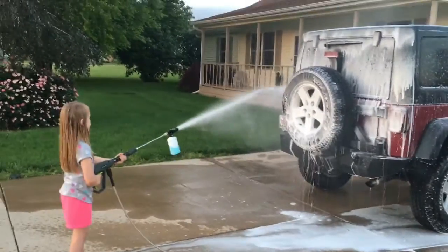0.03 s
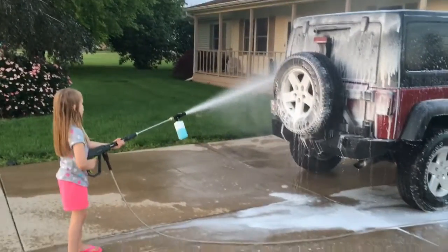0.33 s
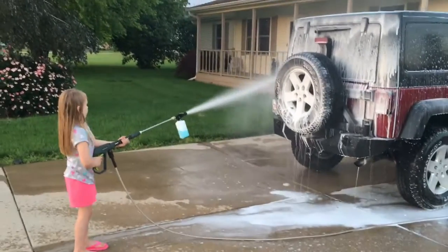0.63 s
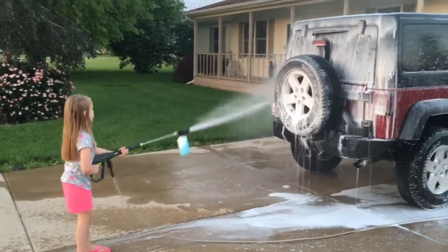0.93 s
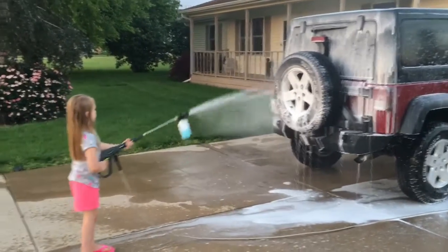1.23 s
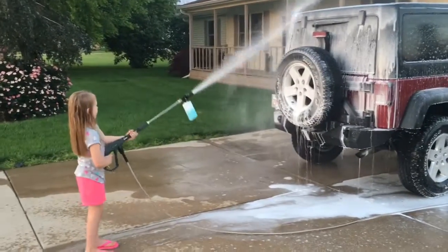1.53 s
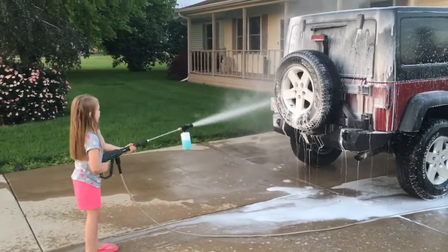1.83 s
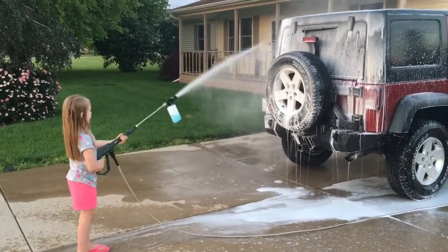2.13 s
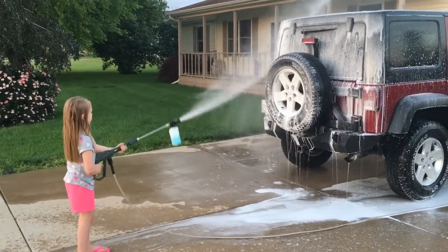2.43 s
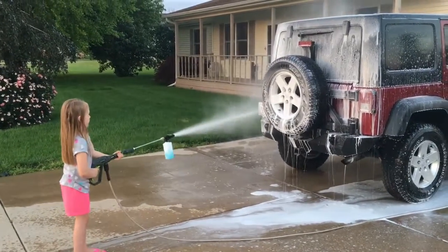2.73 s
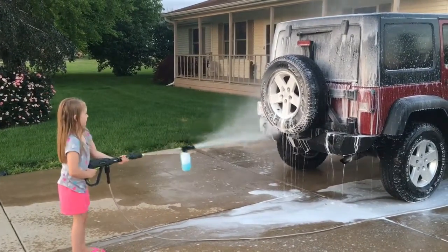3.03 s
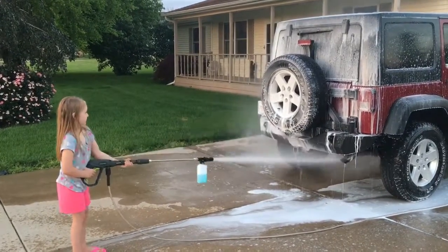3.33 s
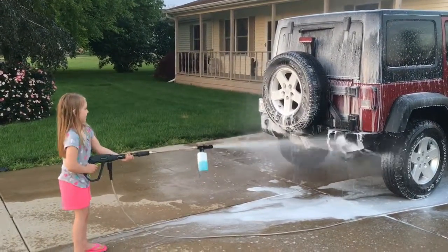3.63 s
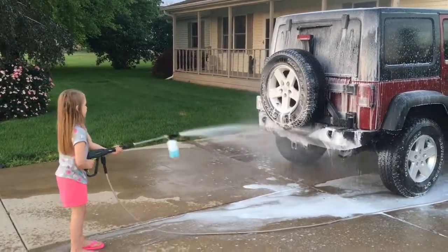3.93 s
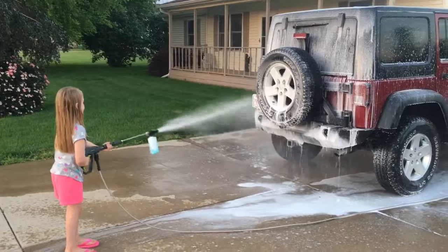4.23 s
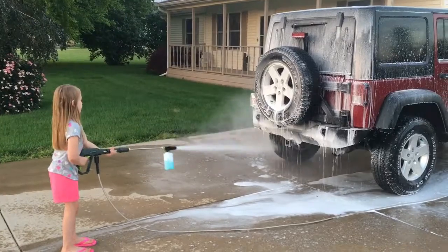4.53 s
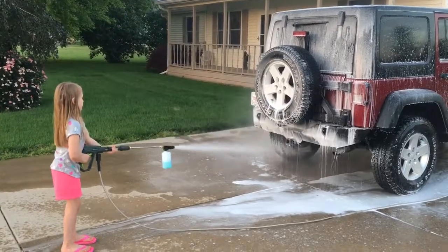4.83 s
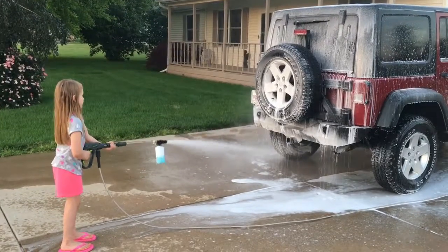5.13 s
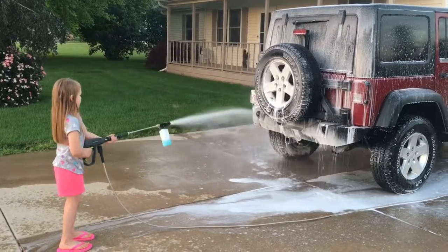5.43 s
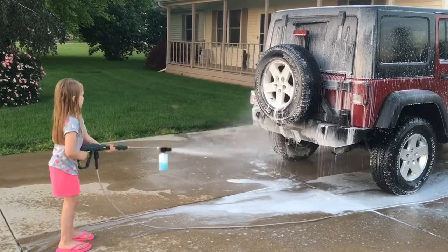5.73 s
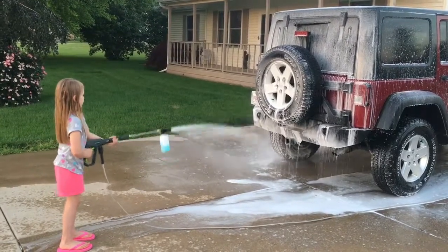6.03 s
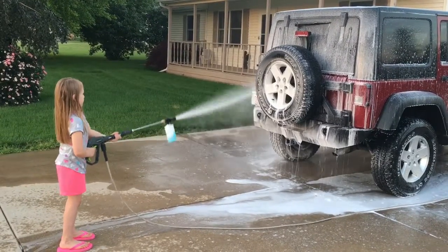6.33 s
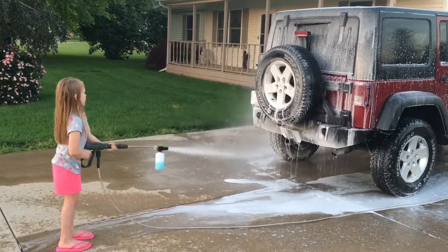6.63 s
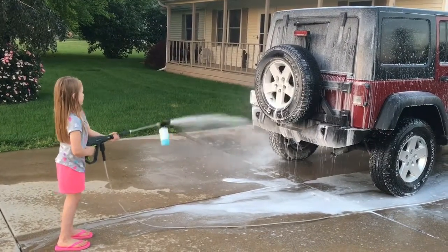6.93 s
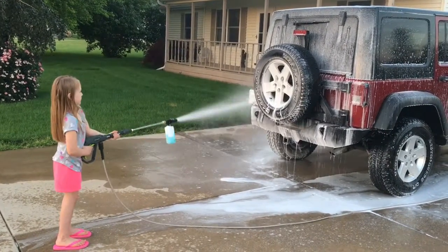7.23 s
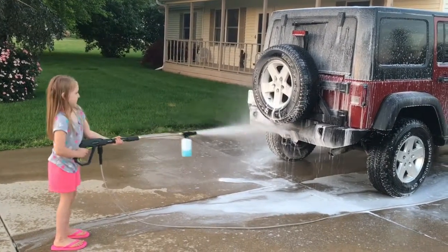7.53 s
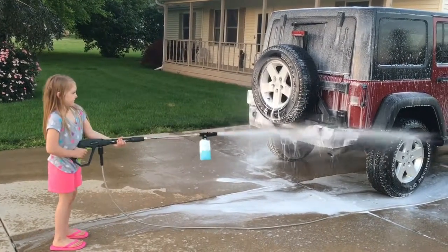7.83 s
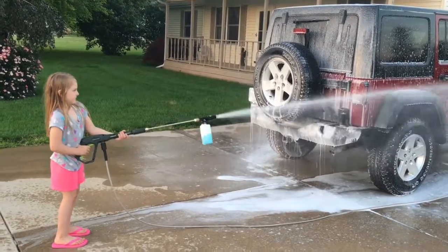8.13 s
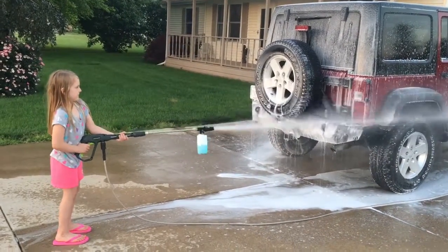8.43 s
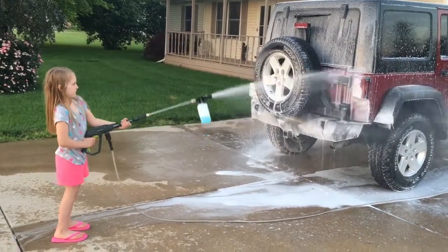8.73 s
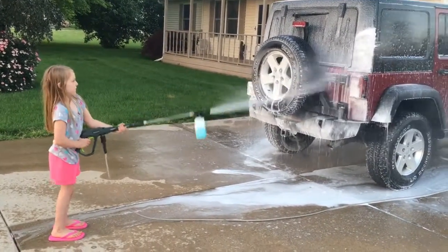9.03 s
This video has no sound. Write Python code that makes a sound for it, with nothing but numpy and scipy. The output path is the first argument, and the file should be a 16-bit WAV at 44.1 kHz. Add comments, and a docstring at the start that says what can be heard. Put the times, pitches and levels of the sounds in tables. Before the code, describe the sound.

A pressure washer sprays foam onto a car on a concrete driveway for about nine seconds without stopping. From the start the nozzle gives a sputtering roar, with a fine, bright hiss and a dense spatter of droplets on the bodywork. A steady pump drone and a dull outdoor rush lie underneath. The spray's tone sweeps up and down as the wand is raised and lowered. Near 2 seconds a panel booms softly, returning faintly later. From about 3 to 4 seconds the jet sizzles along the bumper and turns raspier as it swings toward the listener. Around 4.3 seconds it slips past the car and the splash briefly thins, then sizzles again near 4.8. The sweeping strokes continue, with another sizzle around 7.5 seconds. The spray is brighter and raspier around 8 to 9 seconds, the splash thinning briefly before a last sizzling pass from 8.6.

```python
"""A pressure washer with a foam nozzle soaps a car on a concrete driveway.
From the start the jet roars in the nozzle's short tube, mist hisses and foam spatters over a droning pump;
the echo off the concrete sweeps in pitch as the wand is raised and lowered. Near 2 s a panel booms.
After 3 s the jet sizzles along the bumper and swings towards the listener, then briefly slips past the car.
The wand works lower, rises again from 7 s, and the nozzle swings round once more near the end."""
import sys
import numpy as np
from scipy import signal
from scipy.fft import rfft, irfft
from scipy.io import wavfile
from scipy.ndimage import uniform_filter1d, map_coordinates

SR = 44100
rng = np.random.default_rng(int(sys.argv[2]) if len(sys.argv) > 2 else 0)


def dump_mix(stems):
    """Bounce the given channels to the path in sys.argv[1] as a 16-bit WAV at rate SR."""
    frames = np.atleast_2d(stems).T  # one column per channel
    limited = np.clip(frames, -1, 1)  # hard clip at full scale
    pcm = np.round(limited * 32767).astype(np.int16)
    wavfile.write(sys.argv[1], SR, pcm)


N = 409248
TIME = np.arange(N) / SR
BIN_HZ = np.maximum(np.arange(N // 2 + 1) * SR / N, 1)

# The jet slips past the car and the splash thins: start_s, length_s, mist_change_db
JET_MISSES = [(-.1, 0.42, -1.2), (4.22, 0.33, -2), (7.9, 0.65, -.8)]


def from_db(db):
    """Amplitude grows tenfold for every 20 dB."""
    return 10 ** (np.asarray(db) / 20)


def unit_rms(x):
    """Dividing by the rms gives a signal unit power."""
    return x / np.sqrt(np.mean(x ** 2) + 1e-20)


def noise(gain):
    """Filtered white noise takes on the filter's spectrum; unit rms."""
    return unit_rms(irfft(rfft(rng.standard_normal(N)) * gain, N))


def drift(rate_hz):
    """Low-passed noise is a slow random fluctuation; unit rms."""
    return noise(1 / (1 + (BIN_HZ / rate_hz) ** 2))


def colour(spectrum):
    """A spectral envelope: gain from straight lines in decibels against log frequency."""
    hz, db = np.transpose(spectrum)
    return from_db(np.interp(np.log(BIN_HZ), np.log(hz), db))


def swells(rows):
    """Raised-cosine envelopes in dB rise and fall about each event's middle."""
    return sum(db * np.cos(np.pi * np.clip((TIME - middle_s) / length_s, -.5, .5)) ** 2
               for middle_s, length_s, db in rows)


def passes(rows, edge_s=0.12):
    """Trapezoidal envelopes in dB: the fan of spray takes edge_s to cross an edge."""
    return sum(db * np.clip(.5 + np.minimum(TIME - start_s, start_s + length_s - TIME) / edge_s, 0, 1)
               for start_s, length_s, db in rows)


def tube_resonance(modes, skirt_widths):
    """Turbulence drives each mode of a tube independently; its power is proportional to its bandwidth."""
    out = 0
    for pitch_hz, width_hz, db in modes:
        response = 1 / np.hypot(1, (BIN_HZ / pitch_hz - pitch_hz / BIN_HZ) * pitch_hz / width_hz)
        skirt = 1 / np.hypot(1, (BIN_HZ - pitch_hz) / (skirt_widths * width_hz))
        out += noise(response * skirt) * from_db(db) * np.sqrt(width_hz)
    return unit_rms(out)


def nozzle():
    """Turbulent mixing of air and soap excites quarter-wave resonances: a sputtering roar and rasp."""
    # Low and high resonances of the tube: pitch_hz, width_hz, relative_db
    roar_modes = [(1107, 123, 1), (960, 122, -7.5)]
    rasp_modes = [(3418, 367, -1), (5650, 780, -5), (7940, 820, -15.5)]
    # Spectrum of the open jet: frequency_hz, relative_db
    jet_spectrum = [(100, -4), (250, 4), (440, -5), (560, -0.5), (700, 2.5), (900, 10), (1300, -14),
                    (1700, -7), (2300, 6), (2720, -13.5), (3100, 11), (4200, 5.5), (4900, -2.5), (6300, 3),
                    (7200, -11), (10000, -5.5)]
    # The nozzle gulps air: middle_s, length_s, roar_boost_db
    gulps = [(.09, .12, 3.5)]
    # The nozzle swings towards the listener: middle_s, length_s, rasp_boost_db
    swings = [(3.62, 0.74, 3), (4.8, 0.48, 0.2), (8.45, 2.7, 3)]
    facing_db = swells(swings)
    sputter = drift(rate_hz=29)
    intake_db = swells(gulps) + 0.25 * drift(rate_hz=3)   # air is drawn in unevenly
    roar_db = -35 + 0.26 * facing_db + intake_db + 0.67 * sputter
    roar = from_db(roar_db) * tube_resonance(roar_modes, skirt_widths=6)
    rasp = from_db(-38.5 + facing_db) * tube_resonance(rasp_modes, skirt_widths=0.66)
    open_jet = from_db(-40.5 + 0.53 * facing_db) * noise(colour(jet_spectrum))
    return roar + (rasp + open_jet) * from_db(0.99 * sputter)


def wand_lag_ms():
    """Echo delay follows wand height; each stroke runs from rest to rest, like half a pendulum cycle."""
    # Turning points of the wand: time_s, echo_lag_ms
    turning_points = [(0, 1.86), (.41, 1.96), (0.911, 1.91), (1.19, 1.56), (1.551, 2.39), (1.95, 1.62),
                      (2.3, 2.23), (2.78, 1.57), (3.36, 1.4), (3.74, 1.59), (4.01, 1.44), (4.26, 1.53),
                      (4.58, 1.185), (4.839, 1.167), (5.15, 1.063), (5.58, 1.51), (5.94, 1.03),
                      (6.38, 1.695), (6.78, 1.01), (7.18, 1.6), (7.58, 1.46), (8.18, 2.06), (8.62, 1.79),
                      (8.98, 2.35), (9.32, 1.59)]
    time_s, lag_ms = np.transpose(turning_points)
    turns = np.arange(len(time_s))
    stroke, progress = np.divmod(np.interp(TIME, time_s, turns), 1)
    return np.interp(stroke + np.sin(np.pi * progress / 2) ** 2, turns, lag_ms)


def tyre_incidence(square_lag_ms=1.62, width_ms=0.2):
    """Normal incidence splashes most: nears 1 at the height where the jet meets the spare tyre squarely."""
    return np.exp(-((wand_lag_ms() - square_lag_ms) / width_ms) ** 2)


def mist(flutter_db=1.46, bands=10):
    """Atomisation: the spray tears apart with a fine hiss, each droplet size fluctuating on its own."""
    # Spectrum of the hiss: frequency_hz, relative_db
    hiss_spectrum = [(3000, -27), (5000, -6), (6500, 2.5), (7100, 3), (7900, 5), (9700, 3), (10450, -2),
                     (11100, -1), (12400, -3), (13000, -9), (14000, -12.5), (15700, -29.5)]
    # The jet catches an edge and throws up a cloud: middle_s, length_s, boost_db
    clouds = [(1.2, .55, 2), (4.0, 0.23, 2.5), (6.5, .25, 1.5), (7.33, .4, 1)]
    level_db = -37.5 + 0.9 * tyre_incidence() + passes(JET_MISSES) + swells(clouds)
    hiss = rfft(noise(colour(hiss_spectrum)))
    centres_hz = np.geomspace(5000, 15000, bands)
    out = 0
    for weights in np.eye(bands):
        band = irfft(hiss * np.interp(BIN_HZ, centres_hz, weights), N)
        out += band * from_db(flutter_db * drift(rate_hz=12))
    return out * from_db(level_db)


def ground_echo(direct, reflection=0.7, dull_hz=3170):
    """Comb filtering: wet concrete adds a duller copy, later when the wand is higher."""
    dull = irfft(rfft(direct) / np.hypot(1, BIN_HZ / dull_hz), N)
    delayed_index = np.arange(N) - wand_lag_ms() * SR / 1000
    return direct + reflection * map_coordinates(dull, [delayed_index], order=3, mode="mirror")


def spatter(drops_per_s=16000, spread_db=6.5):
    """Shot noise: countless droplets of uneven size burst on the bodywork, in clumps."""
    # Spectrum of a droplet's impact: frequency_hz, relative_db
    impact_spectrum = [(60, 1.5), (200, -2.5), (450, -16), (2100, -16), (2700, -9.5), (4000, -3),
                       (7000, -13), (9700, 2.5), (10450, -6.5), (11300, -1.5), (13500, -3.5), (15700, -7.5)]
    # The jet sizzles along the bumper: start_s, length_s, splash_weight
    bumper_hits = [(3.12, 0.92, 2.5), (4.67, .28, 3), (7.42, .47, 3), (8.55, .8, 2.5)]
    sizes = from_db(spread_db * np.minimum(rng.exponential(1, N), 4)) * rng.choice([-1, 1], N)
    drops = sizes * (rng.random(N) < drops_per_s / SR)
    patter = unit_rms(irfft(rfft(drops) * colour(impact_spectrum), N))
    splash = 1.6 * tyre_incidence() + passes(JET_MISSES) + passes(bumper_hits)
    contrast_db = 0.5 * (splash - splash.mean())   # square hits splash much harder than glancing ones
    clumps_db = 1.3 * drift(rate_hz=13)
    return patter * from_db(-42.5 + splash + contrast_db + clumps_db)


def car_echoes(direct, strength=0.53, corner_hz=2400, sway_ms=0.077, count=12, oversample=4):
    """Scattering: wheel, bumper and panels return faint treble echoes that shift as the wand moves."""
    treble_spectrum = rfft(direct) / np.hypot(1, (corner_hz / BIN_HZ) ** 2)
    treble = oversample * irfft(treble_spectrum, oversample * N)
    knots_s = np.linspace(0, N / SR, 30)
    wand_ms = wand_lag_ms()
    out = direct.copy()
    for lag_ms in np.linspace(1, 9, count) * rng.uniform(.9, 1.1, count):
        wobble_ms = sway_ms * np.interp(TIME, knots_s, rng.standard_normal(len(knots_s)))
        follow_ms = 0.29 * rng.uniform(-1, 1) * (wand_ms - wand_ms.mean())
        shift_ms = uniform_filter1d(wobble_ms + follow_ms, size=6000, mode="nearest")
        delayed_index = oversample * (np.arange(N) - (lag_ms + shift_ms) * SR / 1000)
        echo = map_coordinates(treble, [delayed_index], order=1, mode="mirror")
        out += rng.choice([-1, 1]) * strength / np.sqrt(count) * echo
    return out


def pump(shaft_hz=58.745, mains_hz=60, waver_db=2.5, scatter_db=-62.5):
    """Harmonic series: three pistons stress every third shaft order; lines waver crossing the yard."""
    # Harmonics of the pump: shaft_multiple, rms_level_db
    shaft_orders = [(2, -75), (3, -60.5), (4, -67), (5, -57.5), (6, -49.5), (7, -67.5), (8, -91),
                    (9, -45.5), (10, -54.5), (11, -54.5), (12, -64), (13, -79), (26, -82), (28, -69),
                    (29, -60), (30, -80), (31, -60.5), (32, -63.5), (33, -73), (34, -63.5), (37, -62.5),
                    (38, -67), (40, -70), (47, -83)]
    # Magnetic hum of the motor: mains_multiple, rms_level_db
    motor_hum = [(2, -86), (4, -72), (6, -61)]
    turns = shaft_hz * TIME + np.cumsum(0.01416 * drift(rate_hz=0.4)) / SR
    knots_s = np.arange(int(N / SR * 8) + 2) / 8
    out = np.zeros(N)
    for multiple, db in shaft_orders:
        waver, slip = (np.interp(TIME, knots_s, rng.standard_normal(len(knots_s))) for _ in range(2))
        depth = min(from_db((scatter_db - db) / 2), 1)   # strong lines are the steadiest
        phase = 2 * np.pi * multiple * turns + 0.26 * depth * slip + rng.uniform(0, 2 * np.pi)
        out += from_db(db + waver_db * depth * waver) * np.sin(phase)
    for multiple, db in motor_hum:
        out += from_db(db) * np.sin(2 * np.pi * multiple * mains_hz * TIME)
    return np.sqrt(2) * out


def yard(level_db=-44):
    """Stationary background noise: the dull rush of the yard."""
    # Spectrum of the rush: frequency_hz, relative_db
    rush_spectrum = [(20, -20), (45, -8), (60, -2), (110, 1.5), (160, -13.5), (360, -4.5), (435, -16),
                     (520, -5.5), (680, -12.5), (850, -11.5), (1500, -9.5), (2200, -11.5), (2700, -20.5),
                     (8000, -17)]
    return from_db(level_db) * noise(colour(rush_spectrum))


def panel_boom(width_hz=2.6):
    """Forced vibration: a panel booms in a low, narrow band that shifts as the jet wanders over the car."""
    # The panel under the jet: time_s, pitch_hz, relative_db
    boom_track = [(0, 100, -60), (1.3, 110.7, -61), (2.1, 102, -46.5), (2.6, 103.4, -59.5),
                  (3.5, 82.5, -53.5), (5, 84, -49.5), (6.6, 83.9, -49), (8.1, 78, -61), (8.7, 73.2, -49),
                  (9.28, 82.3, -55)]
    time_s, pitch_hz, relative_db = np.transpose(boom_track)
    phase = 2 * np.pi * np.cumsum(np.interp(TIME, time_s, pitch_hz)) / SR
    boom = unit_rms(drift(width_hz) * np.cos(phase) + drift(width_hz) * np.sin(phase))
    return boom * from_db(np.interp(TIME, time_s, relative_db) - 3)


def scene():
    """Superposition: the spray with its echoes, the pump, the yard and the panel add at one point."""
    jet = ground_echo(nozzle() + mist())
    washing = car_echoes(jet + spatter())
    mono = washing + pump() + yard() + panel_boom()
    return np.array([mono, mono])


def record(dry, bass_hz=42, top_hz=15680):
    """Band limiting: the microphone sheds the deepest bass, and the top is cut steeply."""
    high_pass = signal.butter(4, bass_hz, "high", fs=SR, output="sos")
    low_pass = signal.ellip(14, .1, 80, top_hz, fs=SR, output="sos")
    return signal.sosfilt(low_pass, signal.sosfilt(high_pass, dry))


dry = scene()
out = record(dry)
dump_mix(out)
```